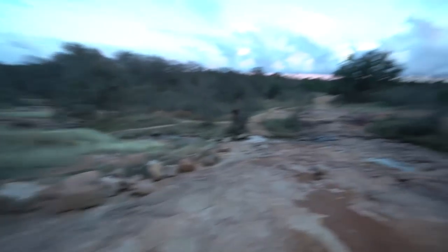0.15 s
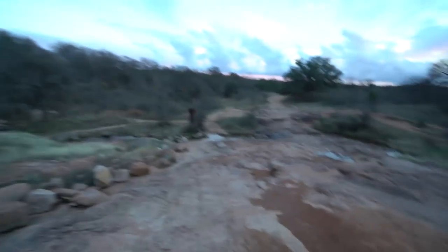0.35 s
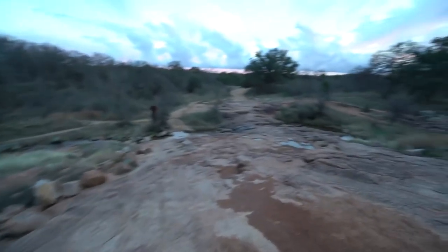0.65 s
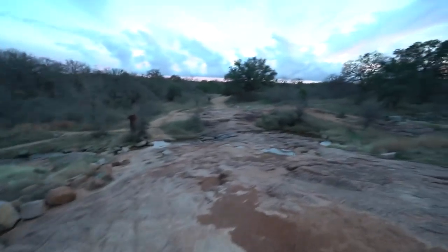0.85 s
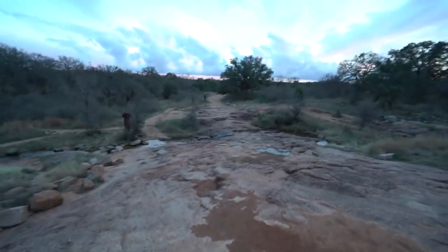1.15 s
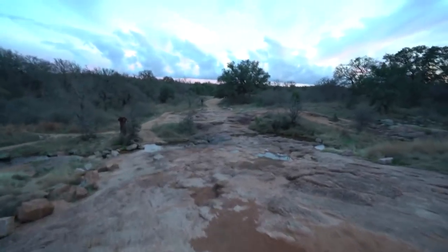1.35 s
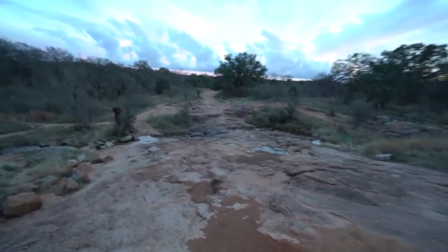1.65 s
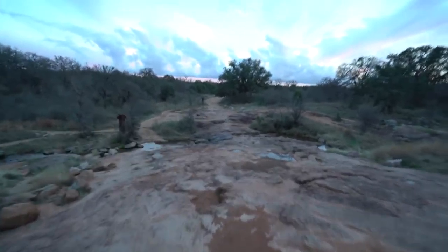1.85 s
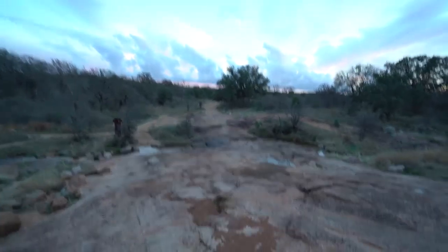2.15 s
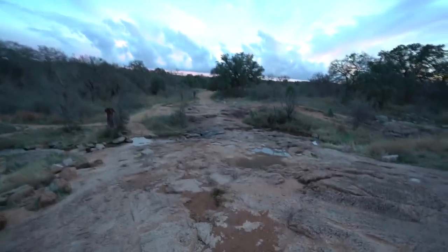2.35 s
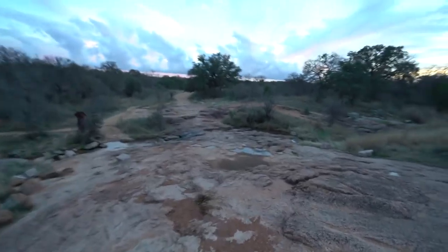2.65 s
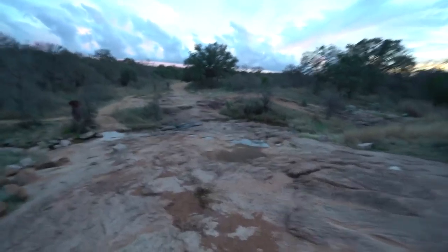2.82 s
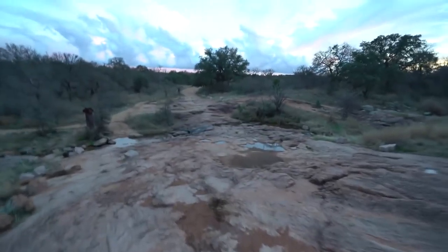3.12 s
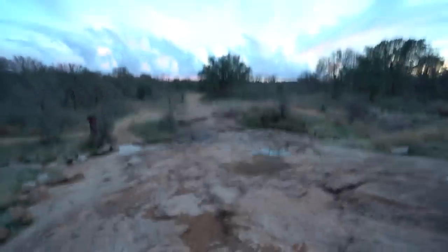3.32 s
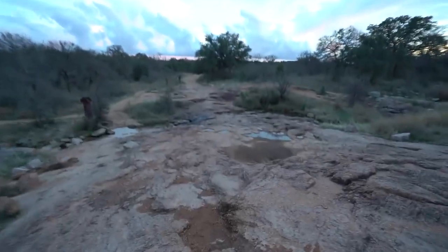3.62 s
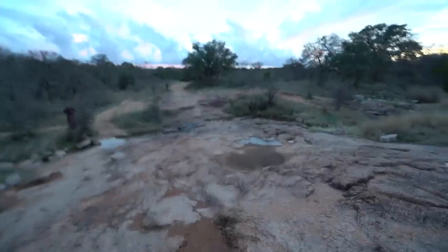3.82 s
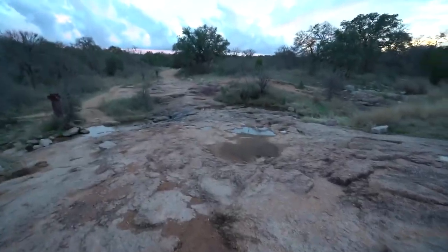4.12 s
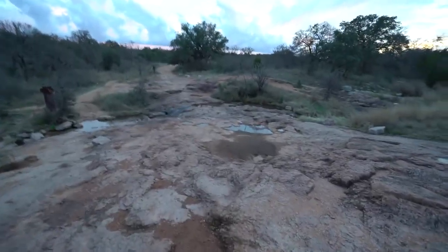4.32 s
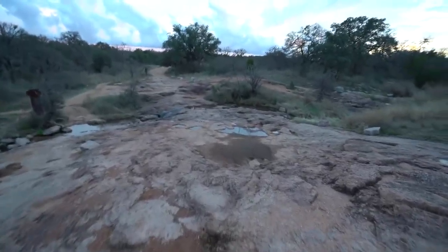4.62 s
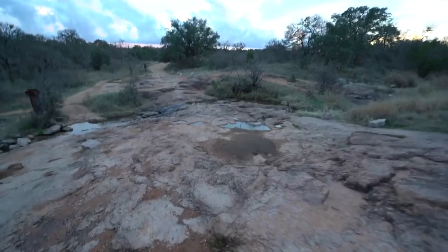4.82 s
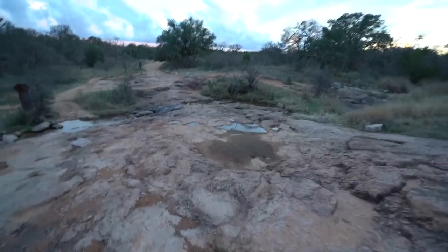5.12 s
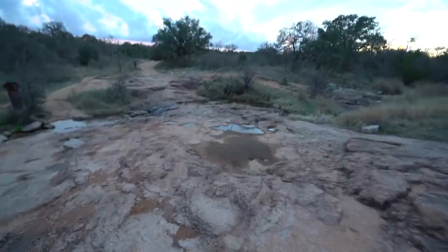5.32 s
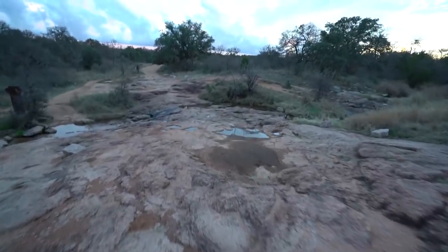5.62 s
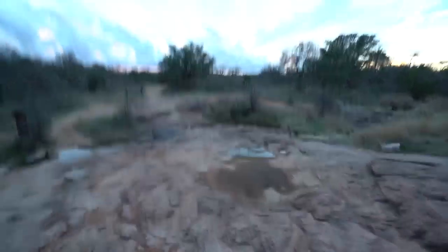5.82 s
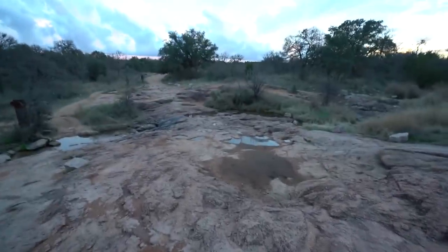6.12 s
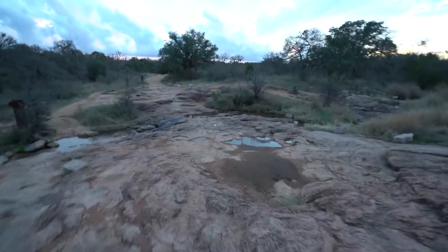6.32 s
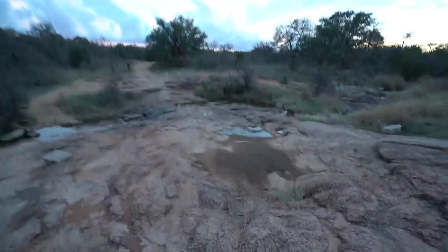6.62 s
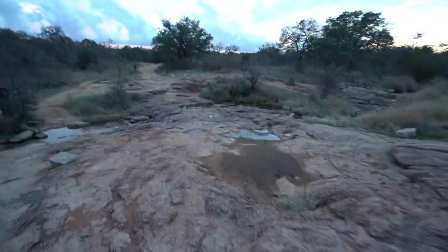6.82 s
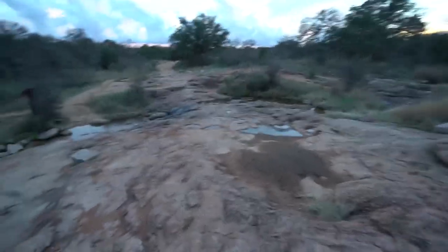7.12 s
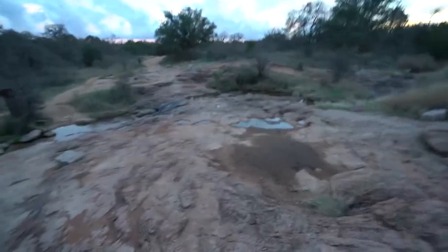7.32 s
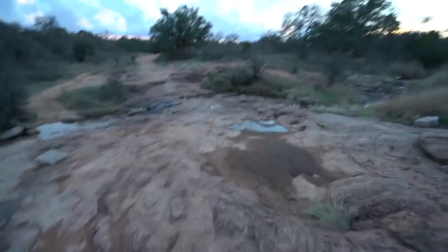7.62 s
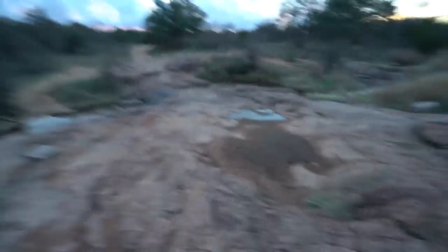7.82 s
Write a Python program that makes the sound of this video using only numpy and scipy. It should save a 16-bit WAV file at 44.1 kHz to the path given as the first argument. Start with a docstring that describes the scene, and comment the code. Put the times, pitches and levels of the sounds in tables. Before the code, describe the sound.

Small frogs trill in a dense, fast chorus of short high whistles outdoors while someone walks slowly over gritty rock, soles knocking and scraping.

```python
"""Open rock with rain pools at dusk: seven near frogs each repeat a short rising whistle about three times a second,
over fainter frogs further off. The listener walks on: soles knock and grind on grit, and something brushes at the left.
Whistles are gliding harmonic tones with one echo and a sparse scattered tail; knocks are damped rings with a noise
crack; grit is random grains, as hiss bursts or low rings; brushing and the hush of the air are filtered noise."""
import sys
import numpy as np
from scipy import signal
from scipy.fft import rfft, irfft
from scipy.io import wavfile
from scipy.ndimage import uniform_filter1d

SR = 44100
rng = np.random.default_rng(int(sys.argv[2]) if len(sys.argv) > 2 else 0)


def to_wav(s):
    """Save 16-bit WAV."""
    ch = np.atleast_2d(s).T  # columns
    pcm = np.round(np.clip(ch, -1, 1) * 32767)  # PCM
    wavfile.write(sys.argv[1], SR, pcm.astype(np.int16))


N = 351036
LEAD_S = 0.00011  # steps, brushing and the hush of the air all reach the left port slightly first


def gain_of(db):
    """Decibels to amplitude."""
    return 10 ** (np.asarray(db) / 20)


def evened(x):
    """Scales to rms 1."""
    return x / np.sqrt(np.mean(x ** 2) + 1e-20)


def read_spectrum(points, hz):
    """Interpolates a spectrum on a log-frequency axis."""
    point_hz, value = np.transpose(points)
    return np.interp(np.log(hz + 1), np.log(point_hz + 1), value)


def along(points, at):
    """Interpolates a two-column curve."""
    return np.interp(at, *np.transpose(points))


def add(mix, start_s, sound):
    """Adds a two-channel sound at start_s seconds."""
    part = mix[:, round(start_s * SR):][:, :sound.shape[1]]
    part += sound[:, :part.shape[1]]


def sides(pan_db):
    """Left and right gains of constant power, pan_db apart."""
    pair = gain_of([[pan_db / 2], [-pan_db / 2]])
    return pair / np.sqrt(np.mean(pair ** 2))


def band_rms(x, low_hz, high_hz):
    """Mean rms of the channels between two frequencies."""
    bins = rfft(x)[:, round(low_hz * N / SR):round(high_hz * N / SR)]
    return np.sqrt((abs(bins) ** 2).sum()) / N


# Left-right likeness of noise. Each row: frequency in Hz, likeness from 0 to 1.
LIKENESS = [(25, 0.87), (60, 0.82), (150, 0.97), (300, 1), (650, 0.76), (1400, 0.55), (3000, 0.27),
            (15000, 0.064)]


def coloured(pair, spectrum):
    """Filters two unrelated noises by a spectrum and makes them alike in the bass, the left leading."""
    hz = np.fft.rfftfreq(N, 1 / SR)
    same = np.clip(read_spectrum(LIKENESS, hz), -1, 1)
    a, b = rfft(pair)
    delayed = a * np.exp(-2j * np.pi * hz * LEAD_S)
    right = same * delayed + np.sqrt(1 - same ** 2) * b
    return irfft(gain_of(read_spectrum(spectrum, hz)) * np.array([a, right]), N)


# Spectrum of the hush. Each row: frequency in Hz, relative level in dB.
AIR_SPECTRUM = [(20, -24), (40, -12), (70, -10.5), (170, -33), (300, -25), (900, -32.5), (1200, -27),
                (2000, -21), (3500, -23.5), (6000, -33.5), (10000, -36.5), (15000, -42.5)]
AIR_DB = -49


def air():
    """The steady hush of the open ground and the microphone; the bass swells with light wind."""
    hush = evened(coloured(rng.standard_normal((2, N)), AIR_SPECTRUM))
    bass = signal.lfilter(*signal.butter(2, 200, fs=SR), hush)
    wander = uniform_filter1d(uniform_filter1d(rng.standard_normal(N), 5000), 5000)
    gusts = gain_of(2.3 * evened(wander))
    return gain_of(AIR_DB) * (hush + (gusts - 1) * bass)


def ring(hz, t):
    """A dull ring of about one cycle, scaled to peak 1."""
    cycles = hz * np.maximum(t, 0)
    wave = np.sin(2 * np.pi * cycles) * (1 - np.exp(-cycles / 0.46)) * np.exp(-cycles / 0.64)
    return wave / abs(wave).max()


def grains(per_s, spread_db):
    """Sparse clicks at random moments, of unequal size."""
    size = gain_of(spread_db * np.minimum(rng.exponential(1, N), 5))
    return size * (rng.random(N) < per_s / SR)


RESONANCE_HZ, RESONANCE_WIDTH_HZ, RESONANCE_DB = 1366, 280, 0


def resonate(x):
    """Adds a resonance near 1.4 kHz to the steps."""
    peak = signal.iirpeak(RESONANCE_HZ, RESONANCE_HZ / RESONANCE_WIDTH_HZ, SR)
    return x + gain_of(RESONANCE_DB) * signal.lfilter(*peak, x)


# A sole drags over the ground.
# Each row: start in seconds, length in seconds, brushing in dB, fine grit in dB, crunch of coarse grit in dB.
SCUFFS = [(0, 0.012, -55, -53.5, -60), (0.16, 0.081, -70, -47, -65), (0.22, 0.0063, -41.5, -47, -52),
          (0.338, .003, -54, -55, -43), (0.48, .002, -54, -58, -58), (0.709, 0.068, -55, -54, -52.5),
          (0.793, 0.044, -56, -47.5, -55), (1.313, 0.011, -50, -48.5, -41), (1.37, 0.089, -55.5, -51, -71),
          (1.957, 0.11, -52.5, -53.5, -50), (2.1, 0.026, -52.5, -53.5, -55),
          (2.26, 0.11, -62.5, -58, -60.5), (2.487, 0.015, -48, -50, -52), (2.59, 0.063, -53, -55, -52.5),
          (2.68, 0.041, -54.5, -51.5, -56), (3.189, 0.039, -54.5, -49.5, -52),
          (3.245, 0.063, -48, -49, -43), (3.408, .01, -57, -63, -54), (3.771, 0.051, -58, -41.5, -44),
          (3.837, 0.14, -59.5, -55, -49), (4.236, 0.013, -52, -48, -43), (4.255, 0.059, -44, -48.5, -55),
          (4.495, 0.026, -57, -55.5, -59), (5.046, 0.032, -60, -59, -49.5), (5.637, 0.043, -65, -54, -53),
          (5.814, 0.013, -53.5, -53, -38.5), (6.613, 0.091, -59, -55, -54),
          (7.043, 0.14, -57, -50.5, -56.5), (7.357, 0.017, -55, -52, -65), (7.477, 0.092, -52.5, -52, -56),
          (7.679, 0.077, -50, -49, -57), (7.944, 0.032, -51, -51, -52)]
# The rustle of walking between scuffs. Each row: time in seconds, brushing in dB, fine grit in dB, crunch in dB.
RUSTLE = [(0, -63, -60, -61.5), (1, -71.5, -60, -60), (1.7, -66.5, -60.5, -63.5), (3, -67, -58, -68),
          (4, -66, -60.5, -56.5), (5, -65, -59, -58.5), (6, -64, -57, -57), (7, -64.5, -56.5, -57),
          (7.96, -54.5, -52, -61)]
SCUFF_RISE_DB_PER_S, SCUFF_FALL_DB_PER_S = 2200, 420


def drag(t):
    """Levels of brushing, grit and crunch: each scuff rises, holds and falls, with the rustle as a floor."""
    s, *rustle_db = np.transpose(RUSTLE)
    level_db = np.array([np.interp(t, s, db) for db in rustle_db])
    for start_s, length_s, *peak_db in SCUFFS:
        early_s = np.maximum(start_s - t, 0)
        late_s = np.maximum(t - start_s - length_s, 0)
        loss_db = SCUFF_RISE_DB_PER_S * early_s + SCUFF_FALL_DB_PER_S * late_s
        level_db = np.maximum(level_db, np.array(peak_db)[:, None] - loss_db)
    return level_db


# Spectrum of the brushing. Each row: frequency in Hz, relative level in dB.
BRUSH_SPECTRUM = [(1500, -15), (3500, -14), (6400, 1.5), (10000, 1), (16000, -2)]
# Spectrum of the fine grit. Each row: frequency in Hz, relative level in dB.
GRIT_SPECTRUM = [(300, -2.5), (700, 4.5), (1400, 6), (1900, 9.5), (3500, 4.5), (5500, 5.5), (9000, -6),
                 (15000, -16)]
CRUNCH_LOW_HZ, CRUNCH_HIGH_HZ = 432, 1710  # rings of the coarse grains


def stride():
    """Coarse grit rings low, fine grit crackles high; the brushing is a denser hiss on the left."""
    t = np.arange(N) / SR
    coarse_t = t[::64]
    brush_db, grit_db, crunch_db = (np.interp(t, coarse_t, db) for db in drag(coarse_t))

    flutter = gain_of(4.8 * evened(uniform_filter1d(rng.standard_normal(N), 90)))
    brush = coloured(rng.standard_normal((2, N)) * flutter, BRUSH_SPECTRUM) * sides(13)

    # each fine grain hisses briefly
    bursts = signal.lfilter([1], [1, -np.exp(-1 / (0.0038 * SR))], grains(500, 1.9))
    grit = coloured(bursts * rng.standard_normal((2, N)), GRIT_SPECTRUM) * sides(1.8)

    ears_t = t[:600] - np.array([[0], [LEAD_S]])
    crunch = np.zeros((2, N))
    for hz in np.geomspace(CRUNCH_LOW_HZ, CRUNCH_HIGH_HZ, num=6):
        grain_ring = np.sqrt(hz) * ring(hz, ears_t)
        crunch += signal.oaconvolve(grains(110, 3.7)[None], grain_ring, axes=1)[:, :N]
    crunch = resonate(crunch * sides(1.5))

    # levels are rms within these bands
    brush *= gain_of(brush_db) / band_rms(brush, 11050, 15700)
    grit *= gain_of(grit_db) / band_rms(grit, 4707, 5930)
    crunch *= gain_of(crunch_db) / band_rms(crunch, 240, 1370)
    return brush + grit + crunch


# Harmonic numbers besides the loud second.
HARMONICS = (1, 3, 4, 5, 7, 8)


def whistle(t, hz, voice, phase):
    """One note: the vocal sac favours the second harmonic; the pitch climbs, levels off and sags as the breath ends."""
    length_s, fade_s, rise_hz, climb, drop_hz, _, _, *overtones_db = voice
    after = np.maximum(t, 0)
    left = np.clip((length_s - t) / fade_s, 0, 1)
    attack = np.sin(np.minimum(after / 0.0069, 1) * np.pi / 2)
    shape = (attack * np.sin(left * np.pi / 2)) ** 2
    shape *= 1 - 0.41 * np.exp(-after / 0.0061)  # swells on after the quick start

    pitch = hz + rise_hz * (np.minimum(after / length_s, climb) - .5)
    pitch = pitch - drop_hz * (1 - left) ** 2 - 40 * np.exp(-after / 0.0024)
    # phase of harmonic 1, half the pitch
    turns = np.pi * (np.cumsum(pitch, -1) / SR + hz * t[:, :1]) + phase
    overtones = sum(gain_of(db) * np.sin(k * turns) for k, db in zip(HARMONICS, overtones_db))
    return shape * (np.sin(2 * turns) + shape * overtones)


# One list a frog. Each row: start in seconds, level in dB.
CHORUS = [
    [(.282, -24), (.618, -23), (.928, -25.5), (1.278, -25), (1.636, -25.5), (1.989, -27.5), (2.337, -26.5),
     (2.675, -26.5), (3.019, -24.5), (3.357, -23), (3.692, -20.5), (4.031, -19.5), (4.361, -20),
     (4.688, -19.5), (5.038, -19), (5.379, -19), (5.737, -19.5), (6.065, -18.5), (6.408, -19), (6.761, -19),
     (7.113, -20), (7.448, -19), (7.78, -17.5)],
    [(.047, -26), (.397, -21), (.731, -17.5), (1.074, -16.5), (1.388, -16.5), (1.733, -16.5),
     (2.086, -17.5), (2.448, -19), (2.79, -15.5), (3.139, -15), (3.474, -14), (3.8, -14), (4.135, -14),
     (4.465, -14.5), (4.794, -15), (5.137, -14), (5.476, -14.5), (5.834, -14), (6.168, -12.5), (6.506, -12),
     (6.863, -12.5), (7.212, -9.5), (7.554, -11), (7.888, -12)],
    [(.103, -20.5), (.414, -18.5), (.725, -19), (1.086, -19.5), (1.466, -19), (1.83, -18.9), (2.179, -19),
     (2.553, -18), (2.913, -21), (3.516, -23.5), (3.876, -20.5), (4.21, -18.5), (4.55, -19), (4.896, -18),
     (5.216, -21.5), (5.542, -19), (5.875, -17), (6.194, -17.5), (6.5, -16.5), (6.843, -16.5),
     (7.163, -18.5), (7.486, -18), (7.795, -15.5)],
    [(.143, -25.5), (.485, -27), (.842, -27.5), (1.205, -28), (1.578, -27), (1.883, -24.5), (2.228, -25.5),
     (2.563, -25.5), (2.918, -24.5), (3.257, -24.5), (3.596, -25), (3.925, -23.5), (4.253, -22.5),
     (4.584, -24), (4.932, -21), (5.278, -23), (5.619, -22.5), (5.961, -25), (6.323, -22.5), (6.678, -23),
     (7.013, -27), (7.352, -22.5), (7.687, -22.5)],
    [(.255, -22), (.639, -24.5), (1.007, -30.5), (1.401, -29.5), (1.809, -29.5), (2.16, -28),
     (2.488, -29.5), (2.844, -27.5), (3.185, -28), (3.515, -23.5), (3.852, -25.5), (4.185, -24),
     (4.518, -23.5), (4.868, -22.5), (5.214, -18.5), (5.55, -19.5), (5.891, -21.5), (6.258, -21),
     (6.59, -25), (6.931, -23), (7.276, -23), (7.616, -23), (7.936, -23)],
    [(.073, -26), (.408, -34), (.767, -31.5), (1.131, -32), (1.503, -31.5), (1.886, -42), (2.232, -29),
     (2.562, -36), (2.916, -26), (3.589, -22), (3.922, -23), (4.251, -21.5), (4.591, -23.5), (4.94, -26),
     (5.289, -26), (5.619, -22), (5.962, -24), (6.281, -23.5), (6.614, -21), (6.998, -19), (7.425, -19.5),
     (7.801, -22.5)],
    [(0, -30.5), (.325, -30), (.665, -32.5), (1.0, -32.5), (1.335, -38), (1.68, -35.5), (2.03, -35),
     (2.385, -37), (2.73, -43), (3.075, -38), (3.41, -40), (3.745, -36.5), (4.085, -39), (4.41, -40),
     (4.74, -44), (5.09, -32), (5.43, -36.5), (5.78, -30), (6.11, -30), (6.455, -31), (6.805, -26.5),
     (7.15, -25), (7.5, -25), (7.84, -32.5)],
]
# One row a frog. Each row: length in seconds, fade in seconds, climb in Hz per note length, share of the note
# that climbs, final drop in Hz, echo delay in seconds (least), echo in dB,
# then harmonics 1 (before the undertone trim), 3, 4, 5, 7, 8 in dB against 2.
VOICES = [(0.046, .016, 145, 0.66, 18, 0.017, -13.5, -34, -30.5, -48, -43, -55, -62),
          (0.042, 0.0063, 173, 0.74, 5, 0.015, -15.5, -40, -37, -49, -46, -65, -46),
          (0.035, 0.0071, 106, 0.83, 330, .012, -12.5, -30, -22.5, -38, -37, -41, -39.5),
          (0.0439, 0.0078, 193, 0.78, 5, 0.011, -8, -18, -28, -31, -44, -28.5, -57),
          (0.031, 0.0085, 137, .95, 5, .012, -6, -27.5, -28.5, -36, -34, -61, -33),
          (0.044, 0.013, 128, 0.98, 5, .012, -12, -28.5, -28, -36, -35, -60, -60),
          (0.038, 0.012, 115, 0.65, 10, .014, -11, -25, -29, -41, -45, -56, -58)]
# One row a frog. Each row: middle pitch of harmonic 2 at the first and last moment in Hz, spread of pitch between
# notes in +-Hz, left lag straight ahead in microseconds, share of the listener's turning,
# extra left-right level at the first and last moment in dB.
PLACES = [(2376, 2360, 4.4, 8, 1., 0.5, -3.5), (2521, 2522, 3.5, 130, 0.9, 0, -1.5),
          (2322, 2308, 11, 32, -.6, -10, 11.5), (2509, 2522, 8.6, 17, 0.79, -1, 0.5),
          (2417, 2434, 5.3, -28, 1., 1.5, -5.5), (2488, 2445, 16.5, -5, 0.79, 0, -4),
          (2364, 2366, 6, 1, 1, -2, -5.5)]
# The listener's turning. Each row: time in seconds, left lag in microseconds.
TURNING = [(0, 250), (.3, 196), (.6, 110), (.9, 50), (1.25, 13), (1.6, 38), (2.0, 35), (2.35, -19),
           (3.0, 30), (3.6, 80), (4.35, 45), (4.65, -33), (5.3, -43), (6.0, -68), (6.4, -18), (6.75, -44),
           (7.1, -27), (7.4, 120), (7.96, 95)]
# The two ports shade a note by its direction. Each row: left lag in microseconds, left-right level in dB.
PORT_SHADING = [(-82, -1), (-30, -8.5), (49, -3), (82, -5), (140, -8.5), (262, -10.5)]
# harmonic 1 weakens against 2 as the listener comes into line with the vocal sacs
UNDERTONE_FIRST_DB, UNDERTONE_LAST_DB = 1, -2.5


def near_frogs():
    """Each note arrives from its side, flutters a little on the way, and is followed by one echo off a rock."""
    mix, t, span_s = np.zeros((2, N)), np.arange(3600) / SR, (0, N / SR)
    for notes, voice, place in zip(CHORUS, VOICES, PLACES):
        first_hz, last_hz, spread_hz, ahead_us, share, first_db, last_db = place
        echo_s, echo_db = voice[5:7]
        draws = rng.random((len(notes), 4))
        for (start_s, db), (phase, wander, beat, tune) in zip(notes, draws):
            hz = np.interp(start_s, span_s, (first_hz, last_hz)) + spread_hz * (2 * tune - 1)
            lag_us = ahead_us + share * along(TURNING, start_s)
            pan_db = along(PORT_SHADING, lag_us) + np.interp(start_s, span_s, (first_db, last_db))
            undertone_db = voice[7] + np.interp(start_s, span_s, (UNDERTONE_FIRST_DB, UNDERTONE_LAST_DB))
            heard = (*voice[:7], undertone_db, *voice[8:])
            ears_t = t - np.array([[lag_us * 1e-6], [0]])
            direct = whistle(ears_t, hz, heard, 2 * np.pi * phase)
            direct *= 1 + 0.02 * np.sin(2 * np.pi * ((50 + 120 * beat) * t + wander))
            echo = np.roll(direct, round((echo_s + 0.00031 * wander) * SR), axis=1)
            add(mix, start_s, gain_of(db) * sides(pan_db) * (direct + gain_of(echo_db) * echo))
    return mix


FAR_LOW_HZ, FAR_HIGH_HZ, FAR_PER_S = 2260, 2523, 33
FAR_FIRST_DB, FAR_LAST_DB = -46.5, -44  # faintest notes, louder as the listener nears


def far_frogs():
    """Faint notes at random moments, pitches and sides."""
    mix, t = np.zeros((2, N)), np.arange(2400) / SR
    draws = rng.random((300, 5))[:round(FAR_PER_S * N / SR)]
    for when, pitch, size, side, lag in draws:
        hz = np.interp(pitch, (0, 1), (FAR_LOW_HZ, FAR_HIGH_HZ))
        ears_t = t - np.array([[lag * 0.00035], [0]])
        note = whistle(ears_t, hz, VOICES[5], 7 * size)
        level_db = np.interp(when, (0, 1), (FAR_FIRST_DB, FAR_LAST_DB)) + 6 * size
        add(mix, when * N / SR, gain_of(level_db) * sides(-11 + 12 * side) * note)
    return mix


SCATTER_DB, SCATTER_T60_S, SCATTER_TURN_HZ = -21.5, 0.64, 1.0


def scatter(x):
    """Sparse returns of random sign from rocks and bushes; three tails take turns as the listener moves."""
    out, t = np.zeros((2, N)), np.arange(12000) / SR
    for k in range(3):
        taps = rng.standard_normal((2, len(t))) * (rng.random((2, len(t))) < .03)
        taps *= gain_of(-60 * t / SCATTER_T60_S) * (t > .008)
        taps /= np.linalg.norm(taps, axis=1, keepdims=True)
        turn = np.sqrt(2 / 3) * np.cos(2 * np.pi * (SCATTER_TURN_HZ * np.arange(N) / SR + k / 3))
        out += signal.oaconvolve(x * turn, taps, axes=1)[:, :N]
    return gain_of(SCATTER_DB) * out


# Soles on stone, before the added step resonance. # Each row: time in seconds, blow in dB, ring in Hz, treble
# crack in dB.
KNOCKS = [(.162, -21, 604, -27.5), (.19, -26, 1110, -34), (.214, -36, 1300, -31), (.227, -40, 1300, -28),
          (.234, -28, 1310, -19), (.267, -32.5, 848, -36), (.319, -27, 1200, -43), (.685, -30.5, 472, -53),
          (.709, -29, 730, -51), (1.316, -24, 620, -42), (1.328, -28, 1500, -43), (1.373, -31, 1540, -29),
          (1.894, -20.5, 715, -51), (1.925, -25.5, 660, -46), (1.978, -25.5, 1320, -42),
          (2.049, -41, 821, -53), (2.45, -36, 1320, -51), (2.565, -32, 670, -47), (3.043, -32.5, 1450, -56),
          (3.138, -32, 1410, -52), (3.262, -26.5, 1240, -25), (3.464, -35, 650, -39),
          (3.711, -35, 624, -50), (3.757, -31, 570, -50), (3.77, -37, 1300, -37), (3.784, -21, 1160, -45),
          (3.808, -12, 1240, -45), (3.835, -28, 1140, -47), (3.86, -21, 1260, -46), (4.235, -28, 750, -43),
          (4.281, -23, 1330, -39), (4.399, -25.5, 1350, -51), (4.54, -30.5, 770, -39),
          (5.044, -32, 810, -50), (5.668, -28.5, 630, -51), (5.804, -25, 1250, -51),
          (5.822, -10.5, 1420, -31), (6.303, -28.5, 583, -46), (6.441, -38, 880, -51),
          (6.558, -36, 870, -54), (6.661, -33, 1470, -40), (6.748, -40, 1500, -32), (7.02, -33, 506, -48),
          (7.071, -19, 1250, -37), (7.19, -29.5, 1300, -48), (7.334, -25, 1440, -54),
          (7.593, -32, 1480, -46), (7.647, -25.5, 760, -48), (7.696, -26.5, 710, -34),
          (7.723, -26.5, 1580, -28.5), (7.931, -35, 1440, -43)]


def knocks():
    """The ring of the blow, loose stones that settle after it, and a short crack of treble."""
    mix, t = np.zeros((2, N)), np.arange(1800) / SR
    treble = signal.butter(2, (3500, 11500), "bandpass", fs=SR)
    ears_t = t - np.array([[0], [LEAD_S]])
    noises = rng.standard_normal((len(KNOCKS), 2, len(t)))
    stones = rng.random((len(KNOCKS), 7, 3))
    for (s, db, hz, crack_db), noise, settling in zip(KNOCKS, noises, stones):
        blow = ring(hz, ears_t)
        for late, pitch, size in settling:
            # later stones tend smaller; pitch spreads about the geometric mean of 900 Hz and the blow's
            stone_hz = np.sqrt(900 * hz) * 3 ** (pitch - .5)
            stone = ring(stone_hz, ears_t - .002 - 0.027 * late)
            blow = blow + .5 * size * np.exp(-late / .5) * stone
        crack = signal.lfilter(*treble, noise * np.exp(-t / 0.0061))
        knock = gain_of(db) * sides(2) * blow + gain_of(crack_db) * sides(4.7) * crack
        add(mix, s + .002, knock)  # 2 ms after the table's time
    return mix


def scene():
    """Sums the frogs, their scattered returns, the walker and the air."""
    frogs = near_frogs() + far_frogs()
    return frogs + scatter(frogs) + resonate(knocks()) + stride() + air()


LOW_CUT_HZ, EDGE_HZ = 300, 15950


def record(dry):
    """The microphone's low cut, then the band limit of the recorder."""
    thin = signal.lfilter(*signal.butter(2, LOW_CUT_HZ, "high", fs=SR), dry)
    band_limit = signal.firwin(511, EDGE_HZ, window=("kaiser", 9), fs=SR)
    return signal.oaconvolve(thin, band_limit[None], "same")


dry = scene()
out = record(dry)
to_wav(out)
```